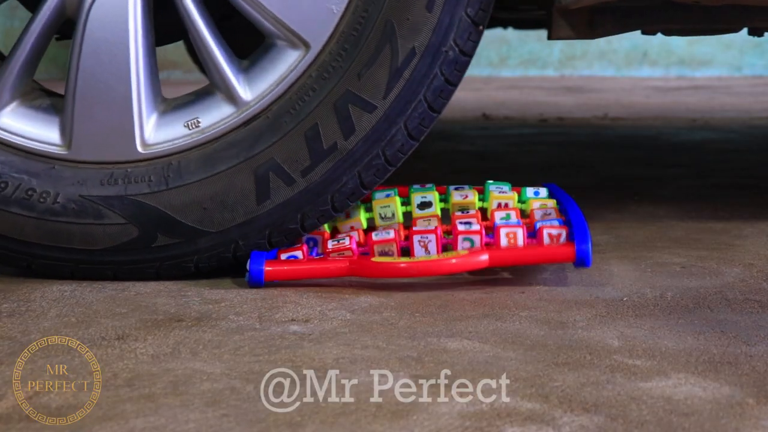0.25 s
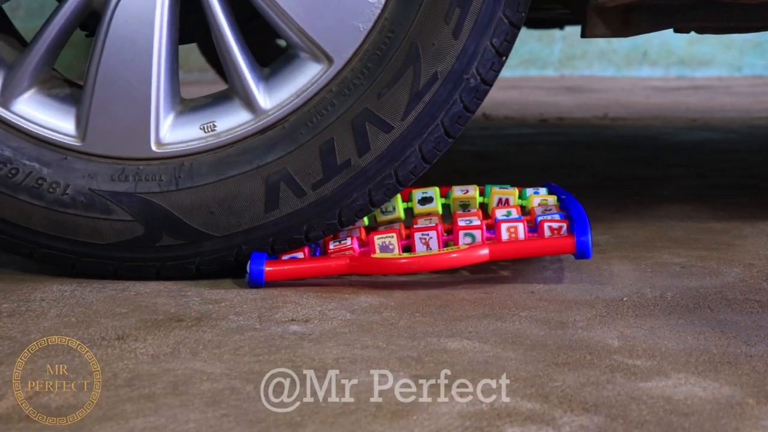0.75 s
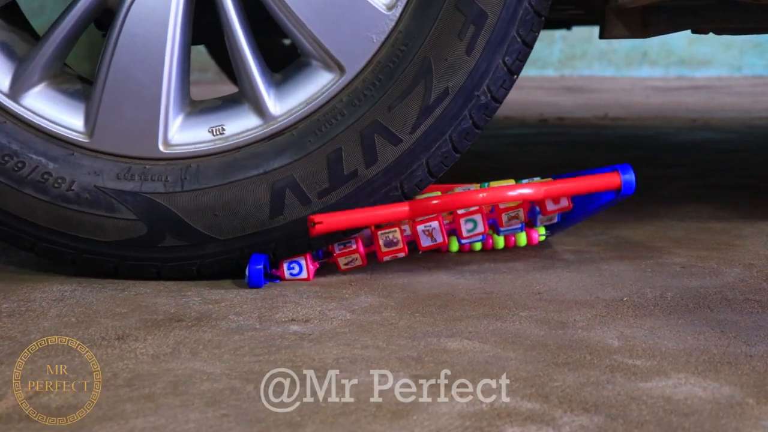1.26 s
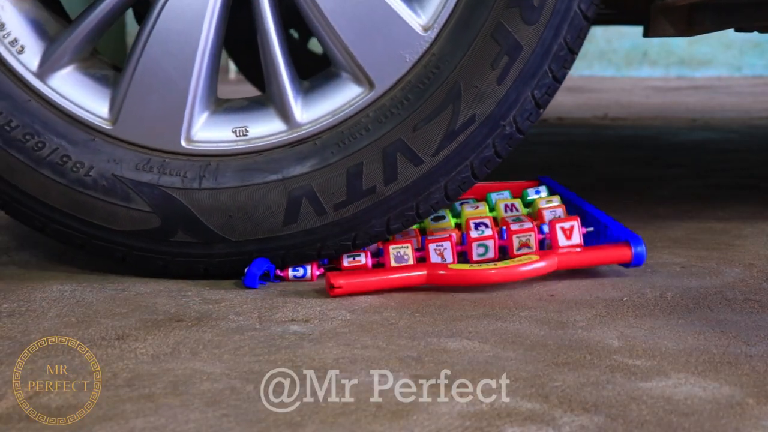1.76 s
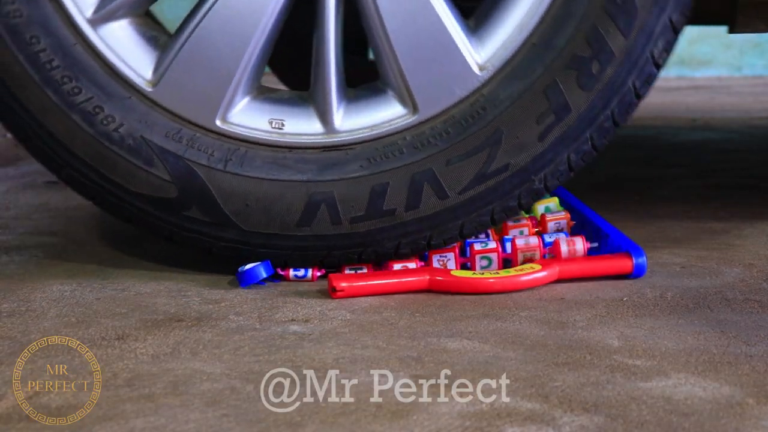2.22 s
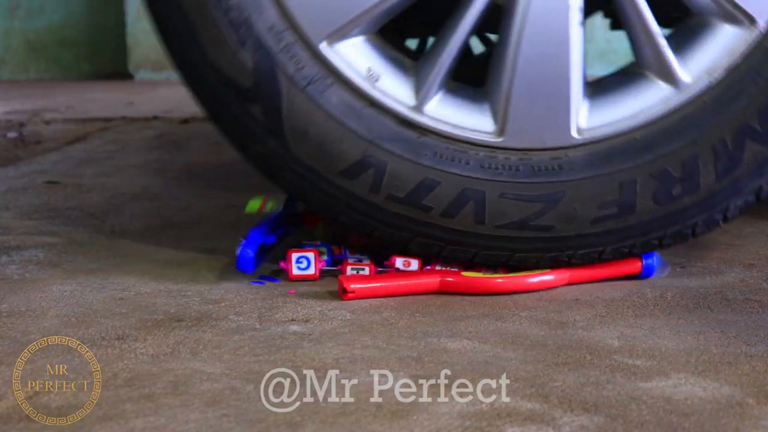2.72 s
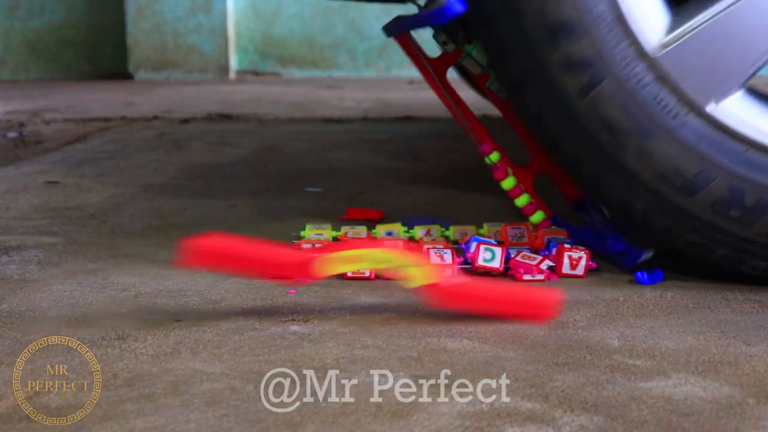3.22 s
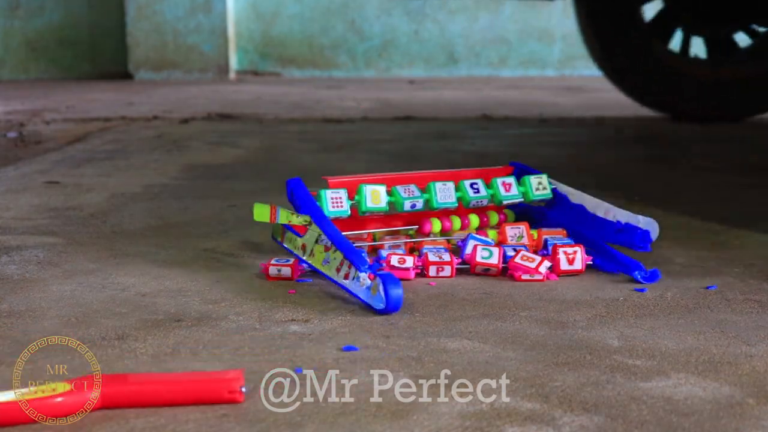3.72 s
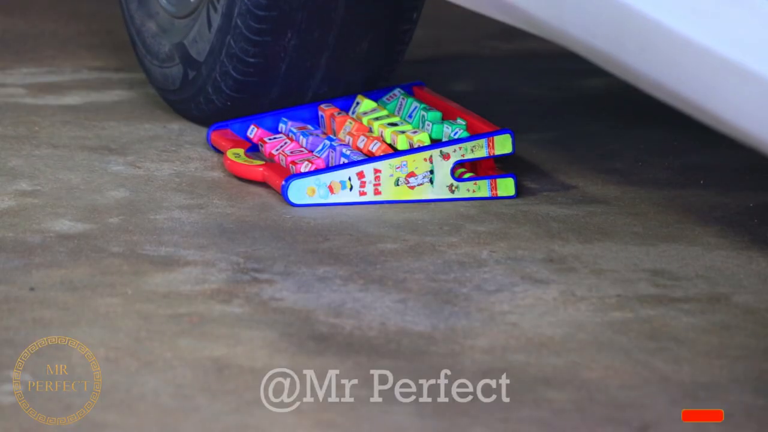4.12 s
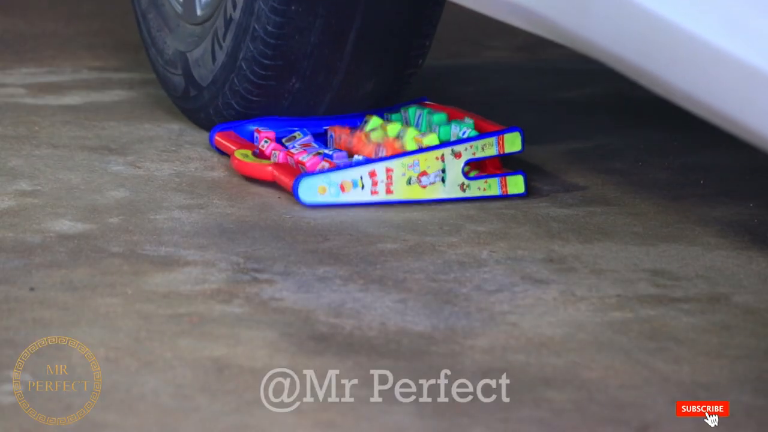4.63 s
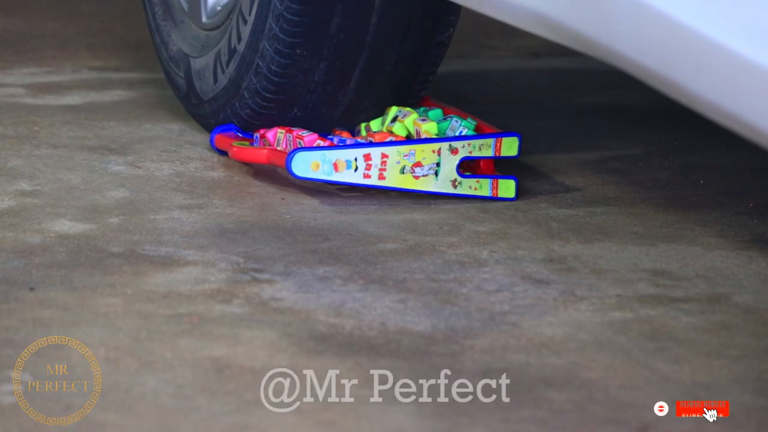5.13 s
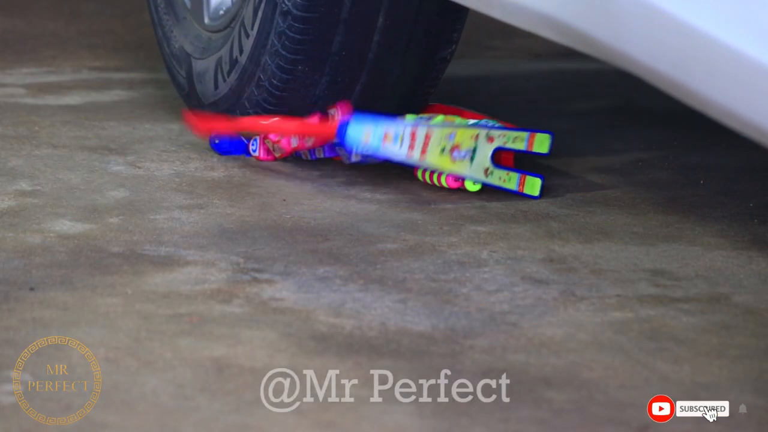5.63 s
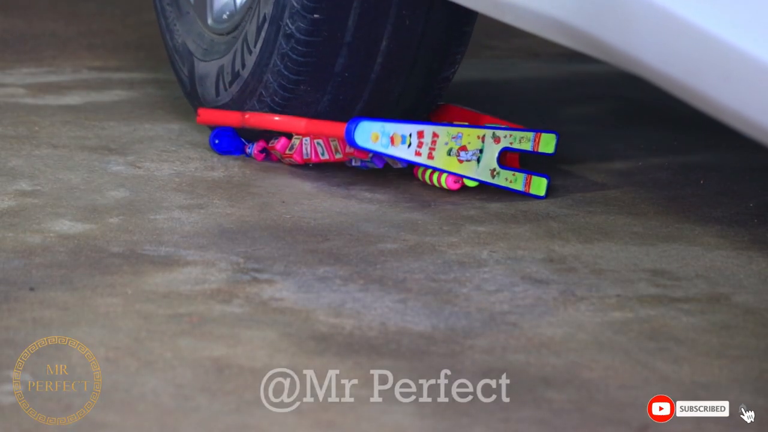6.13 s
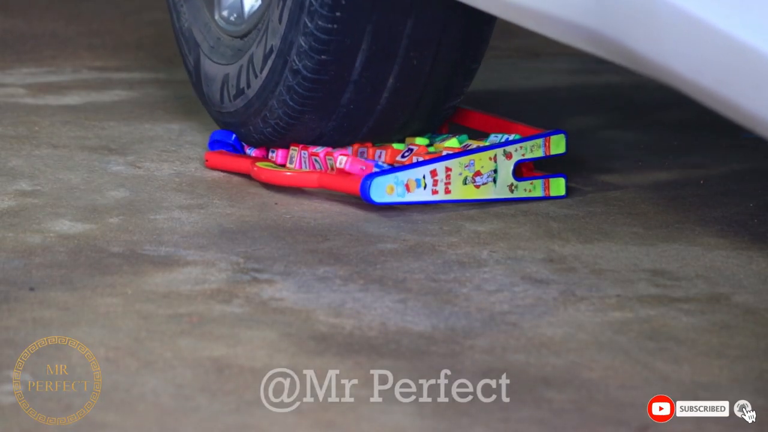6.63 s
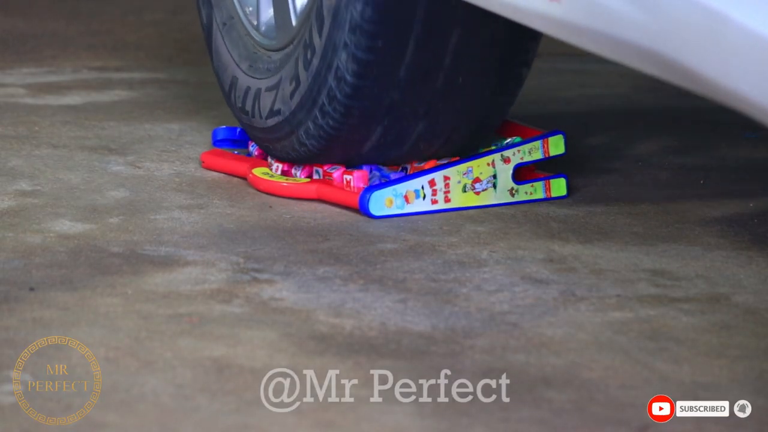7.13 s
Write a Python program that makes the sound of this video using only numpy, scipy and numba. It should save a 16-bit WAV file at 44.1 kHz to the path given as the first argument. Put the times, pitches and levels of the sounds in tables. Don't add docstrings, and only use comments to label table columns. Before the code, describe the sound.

Close to the ground in a hard-walled concrete yard, a car idles while its tyre creeps over a plastic toy. Isolated sharp cracks and tiny ticks build into a dense crunch with heavy thumps, then pieces clatter and skid. After a brief lull comes another short crush, and the slow cracking begins again.

```python
import sys
import numpy as np
from scipy import signal
from scipy.fft import rfft, irfft
from scipy.io import wavfile
from scipy.ndimage import uniform_filter1d
from numba import njit

SR = 44100
rng = np.random.default_rng(int(sys.argv[2]) if len(sys.argv) > 2 else 0)


def inscribe(sig):
    pcm = np.round(np.clip(np.atleast_2d(sig).T, -1, 1) * 32767)
    wavfile.write(sys.argv[1], SR, pcm.astype(np.int16))


def volts_from_db(level):
    exponent = np.asarray(level, float) / 20
    return 10 ** exponent


N = 324576

CUT_S, REPEAT_S = 3.9, 4.92
LENGTH = int(REPEAT_S * SR)


def unit(x):
    return x / np.sqrt(np.mean(x ** 2))


def peaked(x, db):
    return x / np.abs(x).max(axis=1, keepdims=True) * volts_from_db(db)[:, None]


def band(x, lo_hz, hi_hz, order=2):
    edges = [lo_hz, min(hi_hz, 19000)]
    return signal.sosfilt(signal.butter(order, edges, "bandpass", fs=SR, output="sos"), x)


def resonate(x, modes):
    return sum(volts_from_db(db) * band(x, hz - width / 2, hz + width / 2, order=1) for hz, width, db in modes)


def colour(x, points):
    hz, db = np.transpose(points)
    f = np.fft.rfftfreq(len(x), 1 / SR) + 1
    gain = volts_from_db(np.interp(np.log(f), np.log(hz), db))
    return irfft(rfft(x) * gain, len(x))


def curve(table):
    s, *columns = np.transpose(table)
    t = (CUT_S + np.arange(LENGTH) / SR) % REPEAT_S
    return [np.interp(t, s, c) for c in columns]


def walk(rate_hz):
    k = int(SR / rate_hz)
    held = np.repeat(rng.standard_normal(LENGTH // k + 1), k)
    return 1.76 * uniform_filter1d(uniform_filter1d(held, k), k)[:LENGTH]


def place(times, sounds):
    out = np.zeros(LENGTH + sounds.shape[1])
    for when, x in zip(times, sounds):
        i = int((when - CUT_S) % REPEAT_S * SR)
        out[i:i + len(x)] += x
    return out[:LENGTH]


def swells(rows, rise_db_per_s):
    s, hold, db, fade = np.array(rows)[:, :4].T[:, :, None]
    t = np.arange(LENGTH) / SR - (s - CUT_S) % REPEAT_S
    return volts_from_db(db + rise_db_per_s * np.minimum(t, 0) - fade * np.maximum(t - hold, 0))


# start_s, peak_db, pitch_hz of the piece, hollow_knock_db, extra_tearing_db
BREAKS = [(0.0678, -2.5, 10000, -8.5, -2.5), (0.0953, -8, 8100, -46, 0.5), (0.7013, -13.5, 1880, -30, 3.5),
          (0.7288, -12, 7300, -29, -6), (1.151, -7, 7500, -21, -2), (1.9887, -13.5, 7300, -29.5, 2.5),
          (2.0899, -9, 9700, -31, -0.5), (2.339, -8.5, 7300, -20, -6.5), (2.369, -8, 6540, -31.5, -2.5),
          (2.4423, -5, 1700, -17, -6.5), (2.4846, -14, 5600, -32, -3), (2.489, -3, 6600, -19.5, -2),
          (2.5021, -1, 4200, -11, -2), (2.5463, -9, 5500, -18, 0.5), (2.5556, -9, 6700, -21, 5),
          (2.598, -6, 4800, -11, -3), (2.6764, -4.5, 12500, -12.5, 5), (2.873, -16, 6250, -31, 7.5),
          (4.4584, -9.5, 11000, -32.5, 4), (4.536, -6.5, 9300, -13.5, -7), (4.6828, -10, 3060, -32, 0.5),
          (4.7851, -8, 7100, -30.5, -4), (4.798, -8.5, 8500, -26, -6), (4.8543, -7, 2300, -21.5, -3)]
# start_s, peak_db, pitch_hz, hollow_knock_db
CRACKS = [(0.0452, -22.5, 5400, -62), (0.5475, -24.5, 6270, -49), (0.6927, -21.5, 6200, -29.5),
          (0.7727, -22.5, 6270, -46), (0.7789, -24.5, 3500, -51), (0.8576, -28.5, 6600, -54),
          (0.8637, -33, 7300, -44), (1.0048, -32, 3770, -42), (1.2357, -26.5, 12300, -46),
          (1.3017, -24, 13000, -42), (1.3602, -33.5, 10000, -64), (1.4626, -35.5, 4300, -65),
          (1.5244, -28.5, 8000, -63), (1.5678, -26, 4350, -62), (1.5986, -36.5, 3700, -62),
          (1.6171, -19, 12300, -53), (1.6921, -16.5, 8000, -44), (1.7014, -37, 2600, -67),
          (1.7661, -35, 3900, -48), (1.8152, -29.5, 11700, -68), (1.9649, -34, 11100, -70),
          (2.1113, -22, 5070, -42), (2.1498, -14, 6850, -30), (2.2115, -13.5, 9500, -25.5),
          (2.2214, -19.5, 12300, -48.5), (2.2448, -15.5, 3140, -42.5), (2.2653, -25, 2700, -56.5),
          (2.2933, -27, 6300, -68.5)]
# start_s, peak_db, pitch_hz, hollow_knock_db
CRUNCH = [(2.3133, -17.5, 8950, -28), (2.3215, -14, 9800, -29), (2.357, -21, 8600, -48),
          (2.389, -14, 8200, -24), (2.4137, -17, 6440, -31), (2.454, -12, 3330, -31),
          (2.5723, -14, 3500, -42), (2.6126, -16, 7700, -30), (2.7509, -13, 12300, -24.5),
          (2.7904, -30, 7160, -29), (2.824, -20.5, 6300, -29), (2.9308, -27, 9600, -54),
          (2.953, -24.5, 13000, -52), (2.9668, -23, 3400, -36), (2.9944, -20, 5940, -39),
          (4.56, -20.5, 3200, -43), (4.6902, -23.5, 3200, -37.5), (4.708, -21, 4100, -45)]
# start_s, peak_db, pitch_hz, hollow_knock_db
SETTLING = [(3.017, -24, 8100, -45), (3.0267, -26.5, 8600, -43), (3.0726, -28.5, 3700, -53),
            (3.1134, -31, 5900, -51), (3.1336, -34, 5400, -69), (3.1563, -31.5, 5400, -67),
            (3.1726, -22.5, 3350, -41), (3.245, -24.5, 3060, -61), (3.258, -21, 4900, -44),
            (3.2979, -27.5, 5100, -50), (3.332, -22.5, 3900, -46), (3.344, -22, 7900, -47),
            (3.3638, -25.5, 3520, -63), (3.452, -28, 5960, -72)]
# pitch_hz, width_hz, level_db
TOY_MODES = [(1134, 920, 10), (1933, 350, -15.5), (3290, 870, 10.5), (6840, 1620, 9), (12050, 2700, -8)]
# low_hz, high_hz, peak_over_rms_db
SNAP_BANDS = [(320, 1424, 9), (1750, 3280, 12.5), (3840, 6230, 14), (7500, 14570, 15.5)]


def snaps():
    rows = BREAKS + [tuple(r) + (0,) for r in CRACKS + CRUNCH + SETTLING]
    s, peak_db, pitch, knock_db, extra_db = np.transpose(rows)
    fall_db_per_octave = 0.5 - 0.35 * peak_db
    levels = [knock_db]
    for lo_hz, hi_hz, _ in SNAP_BANDS[1:]:
        octaves = np.abs(np.log2(np.sqrt(lo_hz * hi_hz) / pitch))
        levels.append(peak_db - 5.5 - fall_db_per_octave * octaves)
    t = np.arange(2048) / SR
    tear_s = (.0013 * volts_from_db(0.525 * (peak_db + 27) + extra_db))[:, None]
    decay = np.exp(-t / tear_s) + 0.18 * np.exp(-t / (1.95 * tear_s))
    burst = rng.standard_normal((len(s), 2048)) * decay
    burst[:, 0] += 8.16
    burst = burst + resonate(burst, TOY_MODES)
    release = 1. * (t == 0)
    release = release + 0.77 * resonate(release, TOY_MODES)
    direct, spread = 0, 0
    for (lo_hz, hi_hz, crest_db), db in zip(SNAP_BANDS, levels):
        part = peaked(band(burst, lo_hz, hi_hz), db + crest_db)
        direct = direct + part
        rms = np.sqrt(np.mean(part ** 2, axis=1))[:, None]
        spread = spread + rms * unit(band(release, lo_hz, hi_hz, order=1))
    return place(s, direct), place(s, spread)


# start_s, air_push_db, push_length_ms, cavity_ring_db
BLOWS = [(0.069, -2, 0.5, -7.5), (.729, -52, 0.59, -17), (1.149, -27, 0.52, -20), (1.616, -32, 0.41, -26),
         (2.089, -24, 0.44, -11), (0.702, -55, 0.72, -21), (2.150, -30, 0.3, -15), (2.44, -27, 0.6, -16),
         (2.596, -24.5, 0.17, -7), (2.873, -34, 0.37, -30), (4.683, -51, 0.58, -37),
         (2.501, -17, 0.41, -26), (2.678, 0, 0.43, -1.5), (4.4585, -3, 0.62, -14),
         (4.536, -1.5, 0.67, -9.5), (4.856, -17.5, 0.36, -33), (4.784, -28, 0.4, -18)]
# pitch_hz, t60_s, level_db
CARCASS = [(191, 0.1, -27.5), (372, 0.19, -33)]


def tyre():
    s, push_db, ms, ring_db = np.transpose(BLOWS)
    t = np.arange(SR // 2) / SR
    u = t / (ms[:, None] / 1000)
    push = peaked(band(u * np.exp(-u), 50, 1500, order=1), push_db)
    cavity_hz, cavity_t60_s, cavity_db = 240, 1.97, -31
    ring = np.sin(2 * np.pi * cavity_hz * t) * volts_from_db(cavity_db - 60 * t / cavity_t60_s)
    ring = ring * (1 - np.exp(-t / 0.0034)) * np.cos(np.pi * t)
    for hz, t60, db in CARCASS:
        ring = ring + volts_from_db(db - 60 * t / t60) * np.sin(2 * np.pi * hz * t)
    return place(s, push) + place(s, volts_from_db(ring_db)[:, None] * ring) * volts_from_db(2.5 * walk(25))


# start_s, hold_s, level_db, fade_db_per_s, dull_part_db
SHOWERS = [(0.071, 0.06, -26, 61, 15), (0.695, 0.02, -23, 142, 7.5), (1.16, 0.056, -34.5, 70, -4),
           (1.97, 0.4, -34.5, 112.5, 4), (2.314, 0.51, -28.5, 103, 9.5), (2.68, 0.14, -27.5, 57, 0),
           (3.335, 0.1, -36, 110, -12), (4.465, .04, -25, 119, -4), (4.56, 0.028, -20, 47, 6.5),
           (4.685, 0.017, -33, 70, -1)]
# pitch_hz, density_db per Hz
CRACKLE_COLOUR = [(200, -30), (500, -20), (800, -2), (1080, 10), (1450, 0.5), (2050, 13.5), (2600, 13),
                  (3500, 6.5), (6500, 1.5), (12000, -3), (16000, -16.5)]


def crackle():
    size = (rng.random(LENGTH) < .1) * volts_from_db(0.9 * rng.exponential(size=LENGTH))
    grains = signal.lfilter([1], [1, -.95], size) * rng.standard_normal(LENGTH)
    grains = colour(grains, CRACKLE_COLOUR)
    dull, bright = unit(band(grains, 400, 3040)), unit(band(grains, 2180, 16000))
    gain = swells(SHOWERS, rise_db_per_s=2000)
    dull_gain = volts_from_db(np.array(SHOWERS)[:, 4] - 20) @ gain
    return dull_gain * dull + volts_from_db(-11.5) * gain.sum(axis=0) * bright


# start_s, peak_db
TICKS = [(0.2999, -41), (0.3847, -45.5), (0.4068, -32.5), (0.4465, -43), (0.533, -55), (0.571, -41),
         (0.5893, -38.5), (0.6337, -54), (0.808, -34), (0.8297, -38), (0.9074, -39.5), (0.94, -39),
         (0.9794, -34.5), (1.034, -36), (1.0568, -34), (1.0829, -37), (1.1051, -35.5), (1.1329, -43),
         (1.5182, -34), (1.7435, -36), (1.8007, -47), (1.853, -35), (1.8919, -34), (1.9112, -39.5),
         (1.9584, -36), (2.034, -28), (2.744, -15), (2.974, -41.5), (3.2659, -52), (4.8468, -26)]
# start_s, peak_db
FIRST_TICKS = [(4.3404, -48), (4.3588, -48), (4.386, -45), (4.4171, -42), (4.8356, -29), (4.9382, -53.5)]
# start_s, end_s, peak_db, mean_gap_s
CREEP = [(.3, .58, -45, .026), (.593, .688, -40, .0135), (1.38, 1.47, -40, .024), (1.82, 1.98, -40, .022),
         (3.18, 3.33, -36, .02)]


def ticks():
    s, db = np.transpose(TICKS + FIRST_TICKS)
    db = db + 7.0
    for start, end, creep_db, gap in CREEP:
        chance = rng.standard_normal((20, 2))
        when = start + np.cumsum(gap * volts_from_db(1.5 * chance[:, 0]))
        level = np.where(when < end, creep_db + 3.5 * chance[:, 1], -200)
        s, db = np.append(s, when), np.append(db, level)
    click = rng.standard_normal((len(s), 256)) * np.exp(-np.arange(256) / SR / .0004)
    click[:, 0] += 2.5
    return place(s, peaked(band(click, 8600, 16500, order=4), db))


# start_s, hold_s, level_db, fade_db_per_s
SKIDS = [(.715, 0.05, -46.5, 122), (3.482, 0.073, -44.5, 500), (3.585, 0.045, -51.5, 129.5),
         (4.552, 0.105, -39.5, 150), (4.606, .005, -37, 602), (4.684, 0.011, -28.5, 700)]
# pitch_hz, width_hz, level_db
SLIDE_MODES = [(982, 130, -4), (1081, 19, -0.5)]


def slide():
    slips = (rng.random(LENGTH) < .03) * rng.standard_normal(LENGTH)
    ringing = resonate(resonate(slips, SLIDE_MODES), SLIDE_MODES)
    return swells(SKIDS, rise_db_per_s=1497).sum(axis=0) * unit(ringing)


# start_s, firing_hz, level_db
HUM = [(0, 29.6, -59), (.7, 29.5, -60), (1.0, 28.9, -56.5), (1.4, 29.8, -60.5), (2.0, 29.5, -59),
       (2.8, 29.8, -59), (3.1, 31.0, -56), (3.3, 32.1, -52.5), (3.55, 31.7, -56), (3.9, 31.3, -57),
       (3.901, 31.0, -60), (4.44, 30.3, -60), (4.92, 29.7, -59)]
# multiple, level_db
ORDERS_DB = [(1, -3), (2, 0), (3, -15), (4, -11), (5, -9), (6, -17)]
# start_s, level_db
NEARNESS = [(0, -0.3), (2.9, -1), (3.4, -0.5), (3.9, -4.5), (3.901, -0.2), (4.92, -2)]
# pitch_hz, density_db per Hz
CLATTER = [(20, -30), (50, -17), (100, -12), (160, -8), (262, -3), (333, -10), (400, -5), (620, -6),
           (750, -4), (1200, -3), (1450, -9), (2050, -7), (2350, -22), (3000, -45)]
# pitch_hz, density_db per Hz
FAN = [(1800, -44), (2400, 5.5), (3200, 6), (4500, 2), (6000, 2.5), (7500, 0.5), (8800, 0.5), (9300, -7.5),
       (12000, -10), (16000, -14)]


def engine():
    (hz, hum_db), (near_db,) = curve(HUM), curve(NEARNESS)
    clatter_db = -50 - 0.06 * (hum_db + 52.5) + 0.46 * near_db
    fan_db = -57.5 + near_db
    phase = 2 * np.pi * np.cumsum(hz * (1 + .003 * walk(4))) / SR
    hum = sum(volts_from_db(db + .9 * walk(4)) * np.sin(k * phase + k * k) for k, db in ORDERS_DB)
    clatter, fan = (unit(colour(rng.standard_normal(LENGTH), c)) for c in (CLATTER, FAN))
    throb = (1 + 0.07 * np.cos(phase)) * volts_from_db(0.47 * walk(46))
    cycle = phase / (2 * np.pi) % 1
    tappets = 1 + 0.76 * np.exp(-cycle / 0.25) * volts_from_db(2.0 * walk(31.1))
    hum = np.sqrt(2) * volts_from_db(hum_db) * hum
    return hum + throb * volts_from_db(clatter_db) * clatter + tappets * volts_from_db(fan_db + 1.5 * walk(38)) * fan


# band_hz, t60_s, level_db
WALLS = [(127, 0.67, -4.5), (238, 0.73, -14.5), (527, 0.52, -20), (1056, 0.83, -23), (2120, 0.79, -33),
         (3610, 0.81, -28), (9200, 0.57, -25.5), (13000, 0.36, -57)]


def walls(x):
    t = np.arange(SR) / SR
    tail = 0
    for hz, t60, db in WALLS:
        noise = unit(band(rng.standard_normal(SR), hz / 1.25, hz * 1.646))
        tail = tail + volts_from_db(db - 60 * t / t60) * noise * np.sqrt(hz / 8000)
    early = 1 + 2.6 * np.exp(-t / 0.015)
    tail = tail * (1 - np.exp(-t / 0.00068)) * early * 0.034
    return signal.fftconvolve(x, tail)[:LENGTH]


def scene():
    direct, spread = snaps()
    small = ticks() + crackle() + slide()
    whole = direct + small + walls(spread + small) + tyre() + engine()
    cut = int(CUT_S * SR)
    return np.concatenate([whole[LENGTH - cut:], whole])[None, :N]


@njit
def follow(x, release):
    e, out = 0., np.empty(len(x))
    for i in range(len(x)):
        e = max(abs(x[i]), e * release)
        out[i] = e
    return out


def low_pass(x):
    return signal.sosfilt(signal.butter(12, 16750, fs=SR, output="sos"), x)


def record(dry):
    peak = follow(dry[0], np.exp(-1 / (.007 * SR)))
    duck = np.maximum(peak / .45, 1) ** -.9
    late_gain = signal.lfilter([.012], [1, -.988], duck - 1) + 1
    clipped = np.clip(dry * late_gain, -1.1, 1.1)
    top = signal.ellip(8, .2, 60, 16100, fs=SR, output="sos")
    mix = np.clip(signal.sosfilt(top, clipped), -1, 1)
    return low_pass(mix)


dry = scene()
out = record(dry)
inscribe(out)
```